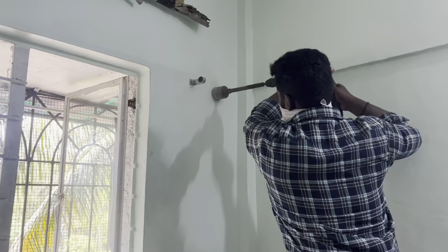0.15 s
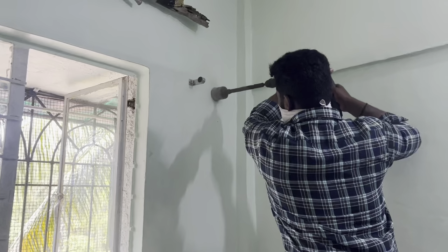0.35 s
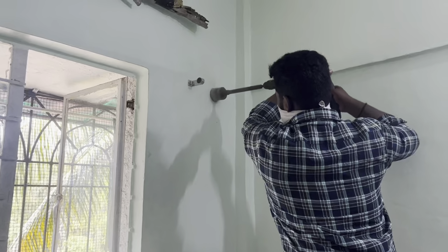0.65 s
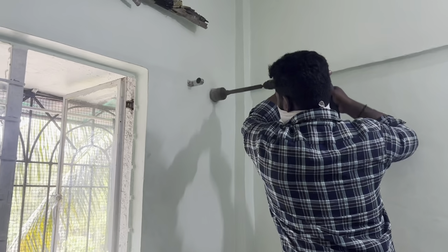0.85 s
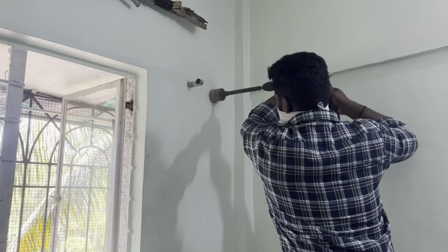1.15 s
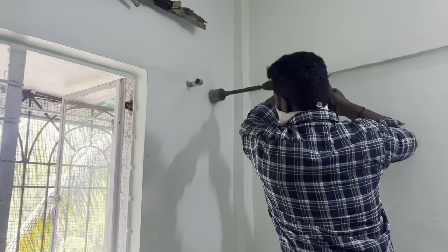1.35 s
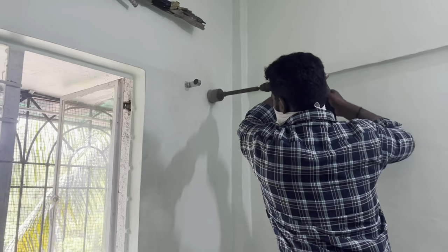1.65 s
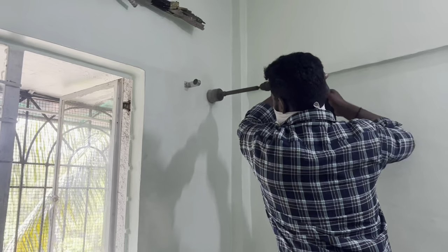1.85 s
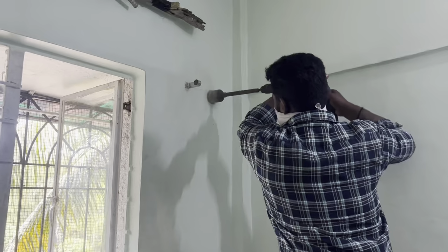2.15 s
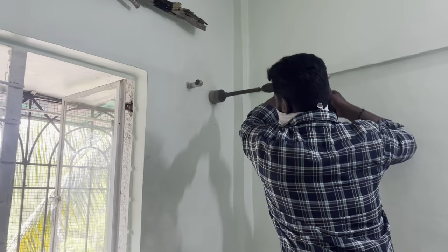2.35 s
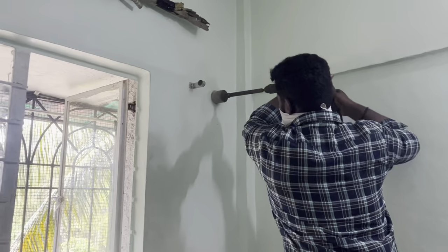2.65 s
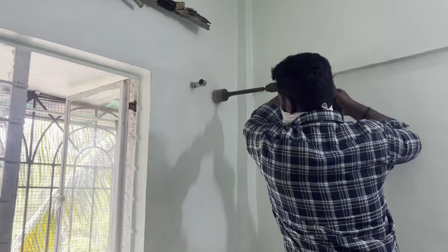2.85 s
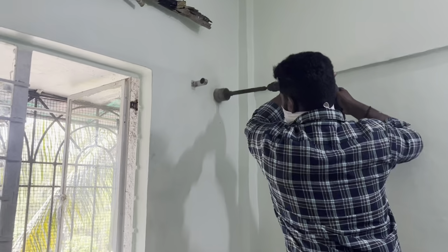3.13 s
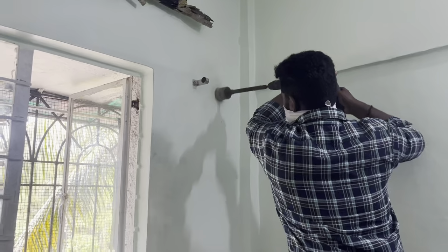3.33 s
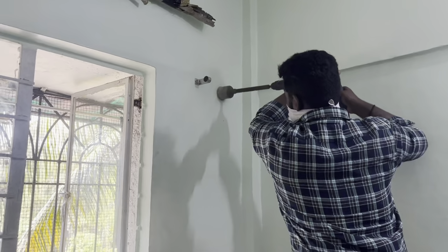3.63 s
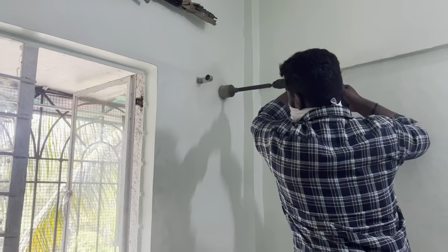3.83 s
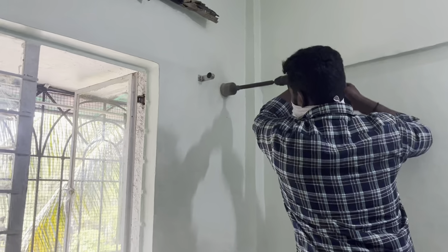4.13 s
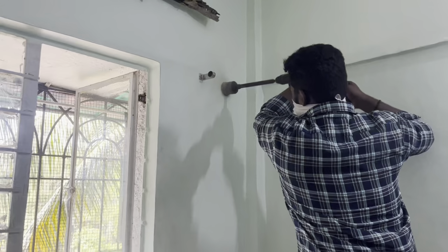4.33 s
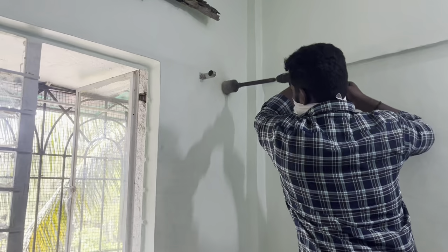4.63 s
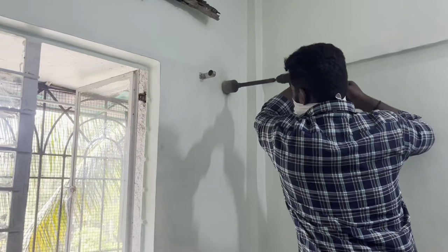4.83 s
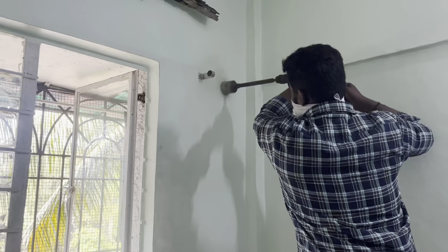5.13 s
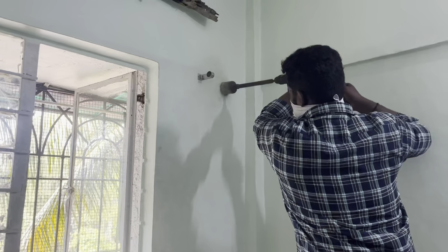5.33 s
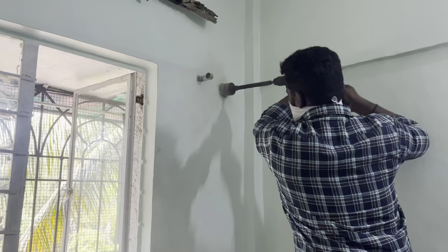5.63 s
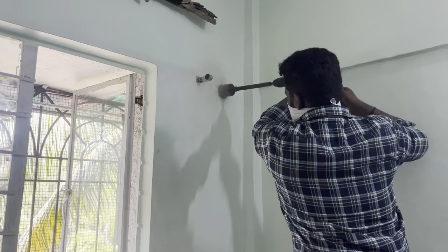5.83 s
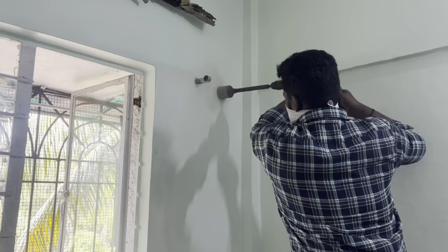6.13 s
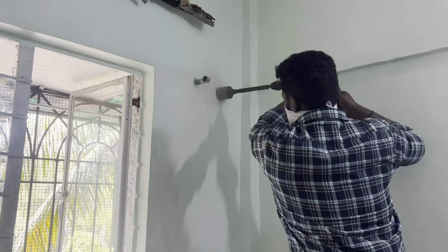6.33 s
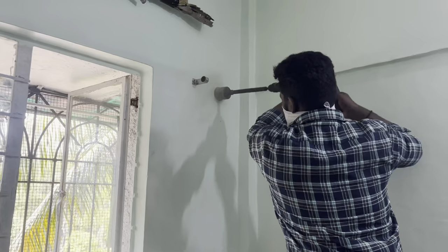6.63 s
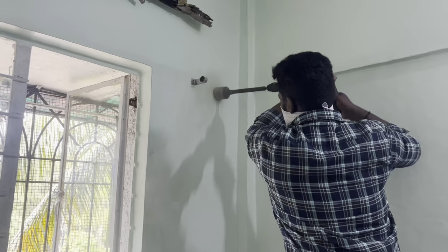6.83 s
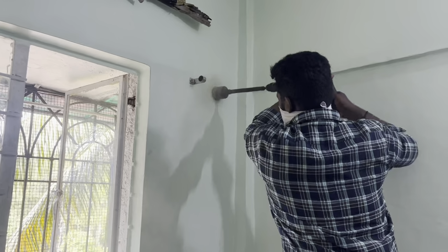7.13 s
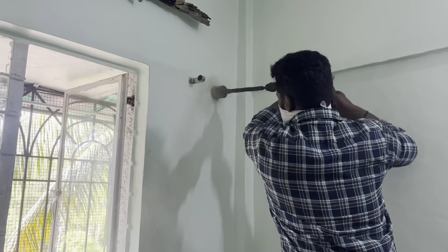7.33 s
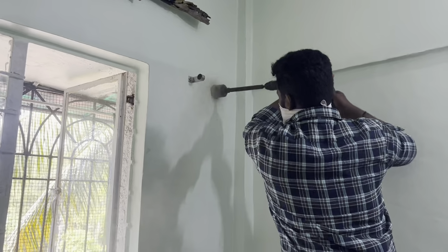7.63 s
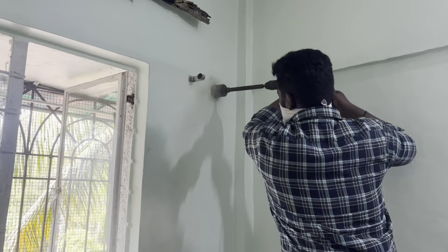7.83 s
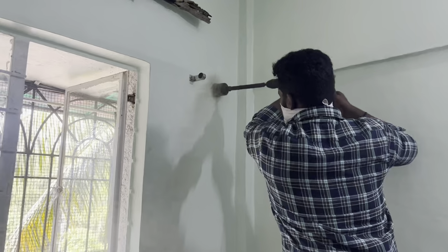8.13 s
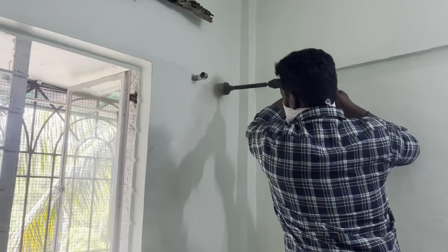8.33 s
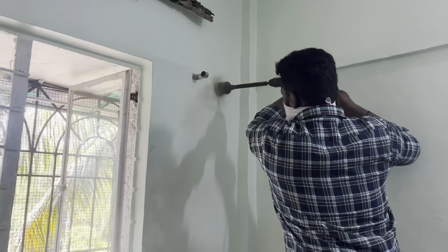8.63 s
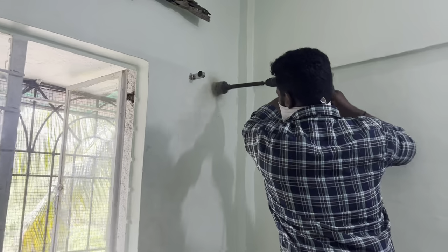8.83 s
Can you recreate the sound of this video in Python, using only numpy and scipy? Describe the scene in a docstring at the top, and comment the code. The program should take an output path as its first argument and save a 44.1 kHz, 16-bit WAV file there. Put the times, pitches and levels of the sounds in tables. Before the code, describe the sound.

A hammer drill with a large steel core bit grinds into a masonry wall without pause. Very fast blows blur into a harsh buzzing rattle with shrill metallic ringing and pulsing gritty hiss. Low thumps and short hard cracks burst irregularly on top as the phone microphone, about two metres away in a bare, echoing room, overloads. It starts slightly louder and duller, then settles.

```python
"""A harsh ringing rattle over pulsing hiss: a hammer drill drives a steel core bit into a masonry wall
in a bare room, two metres from a phone. Some 72 blows a second excite echo noise; it and the grinding
hiss pass through ringing lines and broad humps. Overload jumps of the microphone's rest level, listed in
a table, become falling thumps as all-pass stages delay the bass; short pitched cracks top the hardest blows."""
import sys
import numpy as np
from scipy import signal
from scipy.fft import rfft, irfft, next_fast_len
from scipy.io import wavfile
from scipy.ndimage import uniform_filter1d

SR = 44100
rng = np.random.default_rng(int(sys.argv[2]) if len(sys.argv) > 2 else 0)


def store_pcm(level_fs):
    """Save levels as 16-bit WAV."""
    pcm = np.round(np.clip(level_fs, -1, 1) * 32767).astype(np.int16)
    wavfile.write(sys.argv[1], SR, np.atleast_2d(pcm).T)


N = 396018
SIZE = next_fast_len(N + SR)  # FFT length, padded by over 1 s
HZ = np.maximum(np.arange(SIZE // 2 + 1), 1) * SR / SIZE


def undb(db):
    """Gain of a level in dB."""
    return 10 ** (np.asarray(db) / 20)


def across(table, axis=1):
    """One column of a (Hz, ..) table at every frequency, interpolated over log frequency."""
    table = np.array(table, float)
    return np.interp(np.log(HZ), np.log(table[:, 0]), table[:, axis])


def across_complex(table):
    """Complex value at every frequency of a (Hz, in phase, quarter cycle ahead) table."""
    return across(table) + 1j * across(table, axis=2)


def unit(x):
    """Scale to rms 1."""
    return x / np.sqrt(np.mean(x ** 2))


def walk(rate_hz):
    """Random levels, one per 1 / rate_hz seconds, joined by ramps; rms 1."""
    hold = int(SR / rate_hz)
    held = np.repeat(rng.standard_normal(N // hold + 1), hold)
    return unit(uniform_filter1d(held, hold)[:N])


def swell(t, peak_s):
    """Envelope t * exp(-t), scaled to reach 1 at peak_s."""
    return (t / peak_s) * np.exp(1 - t / peak_s)


def hammer(blows_per_s):
    """Sample index of each blow and the hammer phase in cycles, integrated from the blow rate."""
    turns = np.cumsum(blows_per_s / SR) - 0.04
    blows = np.flatnonzero(np.diff(np.floor(turns)))
    return blows, turns


def struck_echoes(blows, chance):
    """Blow impulses of uneven strength, each echoed by wall and room as decaying noise; rms 1."""
    jitter_s, strength_db, decay_60db_s = .000015, 2.0, 0.34
    late = np.clip(blows + (jitter_s * SR * chance[0]).astype(int), 0, N - 1)
    pulses = np.zeros(N)
    pulses[late] = undb(strength_db * chance[1])
    t = np.arange(SR // 4) / SR
    echoes = rng.standard_normal((3, len(t))) * undb(-60 * t / decay_60db_s)
    # the echo pattern shifts as bit and body move
    share = np.array([undb(8 * walk(1.5)) for _ in echoes])
    share /= np.sqrt(np.sum(share ** 2, axis=0))
    return unit(sum(signal.fftconvolve(pulses * w, e)[:N] for w, e in zip(share, echoes)))


def grinding_hiss(blows, turns, chance):
    """White noise whose level flares after each blow and flutters with the motor; rms 1."""
    strength = undb(2.8 * chance[2])[turns.astype(int) % len(blows)]
    flutter = .12 * np.sin(8 * np.pi * turns)  # the motor turns four times a blow
    flare = 1.2 + strength * np.sin(np.pi * (turns % 1) ** 0.5) ** 2 + flutter
    return unit(flare * rng.standard_normal(N))


def excitation(blows, turns, chance):
    """Spectrum of the drive: echoed blows, strongest low down, plus pulsed and steady hiss."""
    struck = rfft(struck_echoes(blows, chance), SIZE)
    grinding = rfft(grinding_hiss(blows, turns, chance), SIZE)
    even = rfft(rng.standard_normal(N), SIZE)
    low = 1 / (1 + (HZ / 2400) ** 2)
    high_share = .22  # knock that reaches the high rings
    knock = undb(-3.5) * (low + high_share) / (1 + (850 / HZ) ** 4)
    # low down the room evens out the hiss: power share of steady noise
    calm = .8 / (1 + (HZ / 3900) ** 6)
    return knock * struck + np.sqrt(1 - calm) * grinding + np.sqrt(calm) * even


def drill(blows, turns, db, treble_db):
    """Two-port drill: partly alike drives are coloured, and each ringing line or hump swells and fades."""
    # Colour in the sum and difference of the microphone ports, with deep gaps near 8.3 kHz (sum)
    # and 11.8 kHz (difference). Each row: frequency in Hz, gain in dB (relative density).
    sum_colour = [(150, -4), (500, -7.5), (1300, -10), (2230, -11), (3680, -10), (5700, -8), (6700, -10),
                  (7450, -10.5), (7750, -42), (8850, -117), (9100, -19.5), (10200, -14), (11300, -8.5),
                  (12700, -8), (13800, -9.5), (14350, -30)]
    difference_colour = [(150, -18.5), (900, -15), (1500, -4.5), (1800, -18.5), (2300, -20), (3690, -12),
                         (5250, -13), (6100, -10), (7500, -8), (10900, -16), (11800, -46), (12200, -46),
                         (12500, -34), (13200, -10), (14200, -19.5)]
    # Likeness of difference to sum. Each row: frequency in Hz, in-phase part,
    # part a quarter cycle ahead (both ratios).
    likeness = [(905, 0.35, .65), (1550, -0.16, 0.6), (3200, .3, .5), (4650, 0.43, .3), (5500, 0.35, -0.49),
                (7200, 0.17, -.8), (8300, 0, 0), (10500, 0, .8), (11900, 0, 0), (13300, 0, -.93)]
    # Ringing lines and broad humps of the drill, some of them harmonics of the blow rate.
    # Each row: centre in Hz, full width at half gain in Hz,
    # nominal level above the hiss in dB (below 0: a dip).
    drill_rings = [(1005, 30, 3), (1080, 240, 4), (1160, 30, 3), (1235, 30, 3), (1505, 35, 5.5),
                   (1720, 250, 2), (3075, 100, 3.5), (3210, 40, 8.5), (3980, 35, 5), (4750, 300, 2.5),
                   (5020, 90, 7), (5395, 50, 5), (6150, 600, 3.5), (5845, 25, 4.5), (5925, 30, 8.5),
                   (5985, 25, 7), (6022, 20, 11), (6052, 20, 12), (6100, 25, 6), (6160, 25, 6),
                   (6220, 25, 7), (6285, 25, 5), (6345, 25, 6), (6420, 20, 6), (6510, 25, 4),
                   (6920, 80, 2.5), (7130, 100, 3.5), (10850, 500, 6), (11350, 200, -3), (11750, 500, 8),
                   (12400, 200, 6.5), (12680, 300, -5), (13200, 450, 11)]
    # Change of the rings as the bit sinks in. Each row: frequency in Hz, growth in dB per s.
    growth = [(1000, .6), (1200, -.6), (1500, .3), (3200, -.1), (6300, .6), (8000, 0)]

    chance = rng.standard_normal((len(blows), 3)).T
    one, other = (excitation(blows, turns, chance) for _ in range(2))
    alike = across_complex(likeness)
    unlike = np.sqrt(np.clip(1 - abs(alike) ** 2, 0, 1))
    mid = one * undb(across(sum_colour))
    side = (alike * one + unlike * other) * undb(across(difference_colour))
    pair = np.array([mid + side, mid - side])

    split_hz = 8300
    top = 1 / (1 + (split_hz / HZ) ** 8)
    body = irfft(pair * (1 - top), SIZE)[:, :N] * undb(0.35 * walk(20))
    treble = irfft(pair * top, SIZE)[:, :N]
    from_middle_s = np.arange(N) / SR - N / SR / 2
    for hz, width_hz, ring_db in drill_rings:
        peak = (undb(ring_db) - 1) / (1 + (2 * (HZ - hz) / width_hz) ** 2)
        ring = irfft(pair * peak, SIZE)[:, :N]
        grown_db = from_middle_s * np.interp(hz, *np.transpose(growth))
        # narrow rings wander more
        slow_db = min(40 / width_hz, 1.2) * walk(2.5)
        fast_db = 1.8 * walk(16)
        band = treble if hz > split_hz else body
        band += ring * undb(grown_db + slow_db + fast_db)
    treble = treble * undb(treble_db + 0.51 * walk(15))
    return undb(db) * unit(body + treble)


def small_jumps(blows):
    """Small jumps at random blows, low-passed: slow, so they thump without an edge."""
    kicks = np.zeros(N)
    chance = rng.random((len(blows), 3)).T
    heights = (chance[0] < .35) * (2 * chance[1] - 1) * 0.14
    at = np.clip(blows + (.004 * SR * chance[2]).astype(int), 0, N - 1)
    kicks[at] = heights
    return signal.lfilter([.035], [1, .035 - 1], kicks)


def thumps(blows):
    """Jumps of the microphone's rest level: impulses integrated to steps, then filtered."""
    # Overload jumps; hard blows flip the rest level up and back.
    # Each row: time in s, signed height of the ideal step before filtering (full scale = 1).
    jumps = [(0.0053, -0.25), (0.0302, 1.16), (0.032, -0.6), (0.0454, -0.7), (0.0462, 0.99),
             (0.0597, -0.21), (0.1276, -0.94), (0.1521, 0.76), (0.1541, -0.92), (0.1548, 0.51),
             (0.1779, 0.39), (0.1826, -0.48), (0.1961, 0.26), (0.2041, 0.14), (0.2089, -0.16), (0.21, 0.28),
             (0.221, 0.15), (0.2339, -0.78), (0.2496, 0.6), (0.2507, -0.52), (0.2639, 0.48), (0.2889, -0.9),
             (0.3044, 0.54), (0.3051, 0.23), (0.3193, -0.54), (0.3326, 1.41), (0.3442, -0.75),
             (0.3549, -0.15), (0.3868, -1.11), (0.3962, 1.05), (0.4115, 0.18), (0.4136, 0.33),
             (0.4153, -0.79), (0.4161, -0.15), (0.4283, 0.83), (0.4416, -0.66), (0.4551, -0.57),
             (0.4559, 0.63), (0.4927, -0.39), (0.5116, 0.78), (0.5507, -0.28), (0.5668, -0.36),
             (0.5936, -0.16), (0.5949, -0.5), (0.6056, 0.22), (0.6063, 1.17), (0.6073, -0.17),
             (0.6349, -0.4), (0.6633, 0.45), (0.6902, -0.13), (0.691, -0.78), (0.7442, 0.49),
             (0.7589, -0.27), (0.7977, 0.16), (0.8142, 0.16), (0.8815, -0.16), (0.932, -0.25),
             (0.9363, -0.21), (0.9372, 0.79), (0.9488, -0.49), (1.0053, 0.49), (1.0176, -0.66),
             (1.0573, 0.42), (1.0591, 0.19), (1.0733, -0.44), (1.0986, -0.38), (1.0993, -0.53),
             (1.1003, 0.83), (1.1095, -0.37), (1.1141, 0.83), (1.1226, -0.78), (1.124, -0.15),
             (1.1269, 0.32), (1.1281, 0.55), (1.1405, -0.52), (1.1412, 0.19), (1.1965, -0.61),
             (1.2185, 0.22), (1.2223, 0.46), (1.2232, -0.32), (1.2369, 0.33), (1.2469, 0.22),
             (1.2492, 0.41), (1.2512, -0.41), (1.2644, 0.57), (1.2871, -0.29), (1.2889, -0.39),
             (1.2907, -0.65), (1.292, 0.29), (1.2927, -0.19), (1.3185, 0.77), (1.3576, -0.2),
             (1.3868, -0.68), (1.4133, 0.39), (1.4144, 0.22), (1.4152, 0.91), (1.4278, -1.11),
             (1.4552, 1.09), (1.4943, -1.27), (1.509, 0.41), (1.5112, 0.17), (1.5742, 0.31),
             (1.6032, -0.62), (1.6049, 0.15), (1.6143, 0.21), (1.617, 0.2), (1.6198, -0.56), (1.6329, 0.27),
             (1.6339, 0.39), (1.6872, -0.19), (1.7014, -0.2), (1.7253, 0.22), (1.7262, -0.86),
             (1.7273, 0.99), (1.7286, -0.64), (1.7302, -0.14), (1.7518, 0.53), (1.7537, 0.26),
             (1.7702, 0.24), (1.825, 0.29), (1.8348, -0.78), (1.8383, -0.4), (1.839, -0.18), (1.8515, 0.82),
             (1.8533, -0.66), (1.8641, 0.72), (1.8656, 0.33), (1.8665, -0.26), (1.8795, -0.21),
             (1.8907, -0.3), (1.8917, 0.16), (1.8937, 0.23), (1.9188, -0.55), (1.9196, 0.64),
             (1.9209, -0.56), (1.9327, 0.31), (1.9334, -0.42), (1.9441, 0.16), (1.9484, 1.05),
             (1.9494, -0.47), (1.9609, -0.19), (1.9767, 0.15), (1.9888, 0.59), (1.9901, -0.15),
             (2.0021, -0.82), (2.0044, 0.37), (2.0332, 0.27), (2.0739, -1.07), (2.0867, 0.16),
             (2.0988, 0.25), (2.1017, 0.2), (2.1124, 0.64), (2.1431, -0.22), (2.1555, -0.8), (2.1667, 0.33),
             (2.1983, 0.14), (2.2522, 0.18), (2.2936, -0.42), (2.3347, 0.51), (2.3603, -0.28),
             (2.3741, 0.14), (2.3898, -0.19), (2.4182, 0.28), (2.4434, -0.17), (2.4455, 0.21),
             (2.4687, -0.24), (2.4844, -0.46), (2.4856, 0.32), (2.4998, -0.14), (2.5273, 0.3),
             (2.5523, -0.37), (2.5556, 0.19), (2.6924, 0.52), (2.6932, 0.14), (2.7021, -0.78),
             (2.7322, 0.38), (2.7451, -0.75), (2.7462, -0.16), (2.7469, 0.38), (2.7595, -0.17),
             (2.7716, 0.4), (2.8022, -0.33), (2.803, 0.33), (2.8038, -0.33), (2.8149, 0.8), (2.8166, -0.52),
             (2.8262, 0.3), (2.8287, -0.15), (2.8306, -0.15), (2.8313, -0.61), (2.8438, 1.08),
             (2.8709, -0.72), (2.8833, 0.3), (2.9636, 0.31), (2.9935, -0.59), (2.9952, 0.33),
             (3.0222, -0.58), (3.0229, 0.47), (3.0238, -0.16), (3.0754, 0.16), (3.0927, 0.49),
             (3.1321, -0.55), (3.1469, -0.25), (3.1585, 0.44), (3.1595, -0.45), (3.1863, 0.14),
             (3.3106, -0.24), (3.434, -0.16), (3.447, 0.62), (3.4584, -0.3), (3.4705, -0.23),
             (3.5711, 0.85), (3.5804, -0.77), (3.5952, 0.2), (3.6367, 0.26), (3.6539, 0.16), (3.6679, 0.28),
             (3.6925, -1.05), (3.6934, 0.36), (3.7037, 0.2), (3.7061, 0.24), (3.7068, -0.26),
             (3.7086, -0.14), (3.7187, 0.24), (3.7216, -0.42), (3.7224, 0.44), (3.7231, -0.46),
             (3.7365, 1.05), (3.7471, -0.75), (3.7639, 0.56), (3.7764, -0.42), (3.7787, -0.17),
             (3.82, 0.47), (3.8618, -0.55), (3.8873, 0.43), (3.9182, 0.46), (3.9439, -0.66),
             (3.9576, -0.38), (3.9858, 1.01), (3.9997, -0.35), (4.0276, -0.42), (4.0405, 0.18),
             (4.0817, 0.42), (4.0825, -0.59), (4.0921, 0.27), (4.1936, -0.53), (4.2195, 0.43),
             (4.2726, -0.43), (4.2758, 0.32), (4.2863, 0.26), (4.29, 0.25), (4.2909, -0.63), (4.3045, 0.23),
             (4.4003, 1.22), (4.4011, -0.85), (4.4157, 0.29), (4.4164, -0.4), (4.4299, -0.48),
             (4.4716, 0.36), (4.5087, -0.27), (4.5271, 0.64), (4.5359, -0.79), (4.537, 0.28), (4.539, 0.44),
             (4.5399, -0.22), (4.5413, -0.29), (4.5534, -0.23), (4.5546, 0.53), (4.5681, -0.22),
             (4.6322, -0.51), (4.662, 0.33), (4.7018, 0.74), (4.7052, -0.22), (4.7317, -0.18),
             (4.734, -0.77), (4.7469, 0.57), (4.7574, -0.24), (4.7718, 0.14), (4.7731, 0.19),
             (4.8579, -0.16), (4.8713, -0.18), (4.885, -0.41), (4.8979, 0.39), (4.9213, 0.4),
             (4.9399, -0.63), (4.9498, 0.35), (4.9768, -0.23), (4.9904, 0.29), (4.9956, -0.23),
             (5.0092, -0.22), (5.022, 0.46), (5.073, -0.31), (5.1146, 0.23), (5.214, -0.46), (5.2417, 0.42),
             (5.2429, 0.33), (5.2826, -0.21), (5.3261, -0.41), (5.3632, 0.44), (5.3682, 0.28),
             (5.3912, -0.86), (5.406, 0.81), (5.4069, -0.6), (5.4087, 0.24), (5.4592, -0.32),
             (5.5051, -0.28), (5.5284, 0.32), (5.5317, 0.24), (5.5456, -0.14), (5.5566, 0.81),
             (5.5576, -0.21), (5.5591, -0.23), (5.5601, -0.28), (5.5741, -0.54), (5.5883, 0.45),
             (5.6287, -0.27), (5.6571, 1.2), (5.6679, -1.07), (5.669, 0.14), (5.6794, 0.57),
             (5.7375, -0.19), (5.739, -0.47), (5.7766, 0.18), (5.7908, 0.46), (5.7941, 0.16),
             (5.7952, -0.17), (5.849, -0.69), (5.8497, 0.35), (5.8727, 0.19), (5.9309, -0.41),
             (5.9468, 0.15), (5.9601, -0.31), (5.9878, 0.44), (6.0014, -0.25), (6.043, 0.43),
             (6.0442, -0.61), (6.055, 0.34), (6.1224, -0.16), (6.1253, -0.32), (6.126, 0.24),
             (6.127, -0.22), (6.1399, 0.21), (6.1648, 0.19), (6.1655, -0.26), (6.1663, 0.47),
             (6.1907, -0.48), (6.2484, 0.9), (6.2622, -0.58), (6.2648, -0.34), (6.3056, 0.15),
             (6.3155, 0.41), (6.3344, -0.23), (6.3698, 0.39), (6.3742, 0.61), (6.3753, -0.51),
             (6.4014, -0.45), (6.4834, -0.28), (6.552, 0.25), (6.5667, 0.31), (6.5793, -0.23),
             (6.5805, -0.24), (6.6101, -0.17), (6.6214, 0.26), (6.6382, 0.18), (6.639, -0.17),
             (6.6473, -0.24), (6.735, 0.21), (6.7865, -0.33), (6.8275, 0.67), (6.8416, -0.23),
             (6.856, -0.42), (6.8834, 0.18), (6.8842, -0.21), (6.8849, 0.39), (6.8856, 0.87),
             (6.887, -0.87), (6.902, -0.18), (6.9576, 0.24), (6.9678, -1.35), (6.9722, 0.71),
             (6.9859, 0.34), (7.068, -0.7), (7.0816, 0.61), (7.1059, -0.41), (7.1221, 0.19), (7.1514, 0.66),
             (7.179, -0.79), (7.2186, 0.24), (7.2193, -0.44), (7.2209, 0.22), (7.2473, 0.18),
             (7.2714, 0.44), (7.2765, 0.43), (7.2864, -1.03), (7.2906, 0.26), (7.3301, 0.41),
             (7.344, -0.45), (7.3576, 0.16), (7.3871, 0.6), (7.4142, -0.38), (7.4155, -0.42),
             (7.4162, 0.24), (7.4399, 0.31), (7.4411, -0.32), (7.4423, 0.37), (7.4442, -0.25),
             (7.4526, 0.65), (7.4665, -0.74), (7.484, 0.49), (7.5104, -0.39), (7.5636, 0.22), (7.591, 0.68),
             (7.5955, -0.72), (7.8135, -0.52), (7.8173, 0.3), (7.8307, 0.51), (7.8409, -0.22),
             (7.8995, -0.59), (7.9275, 0.22), (8.0539, 0.19), (8.0546, -0.52), (8.0786, 0.53),
             (8.1062, -0.34), (8.1924, -0.18), (8.2213, 0.15), (8.3755, -0.68), (8.3888, 0.34),
             (8.5698, -0.76), (8.5708, 0.29), (8.5795, 0.74), (8.5838, 0.14), (8.6381, -0.22),
             (8.653, -0.18), (8.7471, 0.54), (8.748, 0.37), (8.7891, -0.4), (8.7909, -0.49), (8.792, -0.38),
             (8.7936, -0.15), (8.8003, -0.14), (8.8031, 0.51), (8.8053, 0.44), (8.851, -0.18),
             (8.862, 0.68), (8.8878, -0.38), (8.8905, -0.27)]
    # Passage of a jump through the microphone. Each row: frequency in Hz, dB re an ideal step.
    edge = [(10, -70), (21, -47), (32, -17), (43, -8.5), (53, 0), (70, 1.5), (160, 1.5), (480, 2.5),
            (700, -2), (970, -8), (1350, -10), (2200, -7), (5000, -103)]
    # Port imbalance of a jump, difference over sum. Each row: frequency in Hz, in-phase part,
    # part a quarter cycle ahead (both ratios).
    lean_ratio = [(40, -0.0097, 0.051), (170, -0.01, 0.17), (350, -.07, 0.18), (540, 0.17, 0.28),
                  (790, 0.58, .1), (2000, 0.054, .1)]

    kicks = small_jumps(blows)
    s, height = np.transpose(jumps)
    np.add.at(kicks, (s * SR).astype(int), height)
    # each listed jump rattles on in three small slips that sum to zero
    chatter_share, chatter_s = 0.073, 0.0029
    size, late = rng.random((len(jumps), 2, 3)).transpose(1, 2, 0)
    slips = chatter_share * (2 * size - 1) * abs(height)
    np.add.at(kicks, ((s + chatter_s * late) * SR).astype(int), slips - slips.mean(axis=0))

    steps = rfft(kicks, SIZE) * SR / (2j * np.pi * HZ) * undb(across(edge))
    edge_late_s = 0.00056
    steps = steps * np.exp(-2j * np.pi * HZ * edge_late_s * (HZ > 1350))  # the top of the edge lags
    lean = across_complex(lean_ratio)
    return irfft(np.array([steps * (1 + lean), steps * (1 - lean)]), SIZE)[:, :N]


def cracks():
    """A blip of two or three cycles at its own pitch with a dull knock and a gritty tail, louder left."""
    # Cracks on top of the hardest blows.
    # Each row: start in s, nominal level in dB before the port gains, blip pitch in Hz.
    crack_rows = sorted([(0.0303, -29, 1890), (0.046, -16, 2800), (0.1551, -16, 1940), (0.2508, -17, 1770),
                  (0.2893, -19.5, 1770), (0.3192, -20, 2670), (0.3326, -21, 2410), (0.3868, -21, 2540),
                  (0.3962, -13, 2110), (0.4144, -22, 2160), (0.428, -20, 2200), (0.4557, -12, 2070),
                  (0.5117, -20, 2070), (0.5943, -14, 1890), (0.6075, -15, 1850), (0.6916, -17, 1810),
                  (1.0178, -17, 2200), (1.1004, -13, 2540), (1.1275, -9, 2110), (1.2232, -13, 2370),
                  (1.2513, -10, 2060), (1.2908, -17, 2020), (1.3874, -18, 2890), (1.4279, -11, 2020),
                  (1.4555, -13.5, 2200), (1.4946, -17, 2600), (1.727, -12.5, 2470), (1.8515, -13, 2670),
                  (1.9195, -9, 2060), (1.9487, -18, 1950), (2.0022, -19, 2890), (2.074, -16, 2330),
                  (2.552, -18, 1850), (2.7453, -19, 1890), (2.817, -15, 1940), (2.8311, -16, 2200),
                  (2.8441, -15, 2020), (3.1599, -19, 2490), (3.6929, -16, 2800), (3.7367, -18, 1980),
                  (3.7483, -13, 1810), (3.986, -19, 1980), (4.2868, -15, 1670), (4.4006, -18, 2330),
                  (4.4163, -20, 1940), (5.3915, -19, 1770), (5.4061, -17, 2390), (5.6676, -17, 2150),
                  (6.044, -16, 2070), (6.1661, -14, 1680), (6.2486, -23, 2240), (6.3744, -19, 2450),
                  (6.8276, -19, 2560), (6.9679, -16, 2410), (7.2866, -19, 2110), (7.443, -10, 2400),
                  (7.453, -19, 1940), (7.5954, -22, 2020), (7.8996, -23, 2200), (8.0546, -11, 2110),
                  (8.1933, -15, 2450)] + [(6.8834, -17, 2900), (8.792, -16, 3100)])
    blip_peak_s, blip_sigma_s = .0006, .00032
    knock_share, knock_pitch_ratio, knock_peak_s = .35, .42, .0014
    grit_share, grit_peak_s = .9, .0012

    length = 300
    out, t = np.zeros(N + length), np.arange(length) / SR
    smooth = uniform_filter1d(rng.standard_normal((len(crack_rows), length + 1)), size=7)
    grit = np.diff(uniform_filter1d(smooth, size=7)) * swell(t, grit_peak_s)
    for (s, db, hz), rough in zip(crack_rows, grit):
        at = int(s * SR)
        blip = np.sin(2 * np.pi * hz * t) * np.exp(-.5 * ((t - blip_peak_s) / blip_sigma_s) ** 2)
        knock = np.sin(2 * np.pi * knock_pitch_ratio * hz * t) * swell(t, knock_peak_s)
        out[at:at + length] += undb(db) * (blip + knock_share * knock + grit_share * rough)
    return out[:N] * undb([[0.5], [-3.5]])  # left, right


def scene():
    """Drill, overload thumps and cracks; the drill settles from a louder, duller start."""
    now = np.arange(N) / SR
    # the hammer slows steadily under load and wavers a little
    start_per_s, sag_per_s2, waver_per_s = 73.17, .155, .06
    blows, turns = hammer(start_per_s - sag_per_s2 * now + waver_per_s * walk(1))
    # the drill sinks in level as the hole deepens
    level_db, fade_db_per_s, start_db, settle_s = -21.5, 0.1168, 3, 1.45
    db = level_db - fade_db_per_s * now + start_db * np.exp(-now / settle_s)
    treble_level_db, treble_start_db, treble_settle_s = 0.53, -2.5, 0.66
    treble_db = treble_level_db + treble_start_db * np.exp(-now / treble_settle_s)
    return drill(blows, turns, db, treble_db) + thumps(blows) + cracks()


def record(dry):
    """Phone: all-pass stages delay the bass behind the treble; peaks are rounded and the top is cut."""
    corners_hz, top_hz = np.geomspace(16.3, 1636, 14), 14357
    smear = np.exp(-2j * sum(np.arctan(HZ / corner) for corner in corners_hz))
    smeared = irfft(rfft(dry, SIZE) * smear, SIZE)[:, :N]
    rounded = np.tanh(0.76 * smeared) / 0.72
    low_pass = signal.ellip(8, .2, 60, top_hz, fs=SR, output="sos")
    return signal.sosfilt(low_pass, rounded)


dry = scene()
out = record(dry)
store_pcm(out)
```